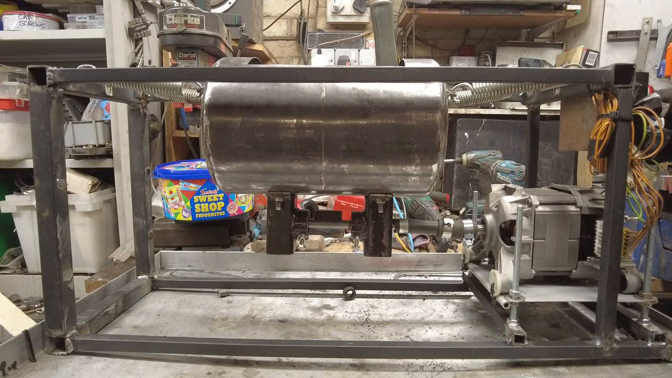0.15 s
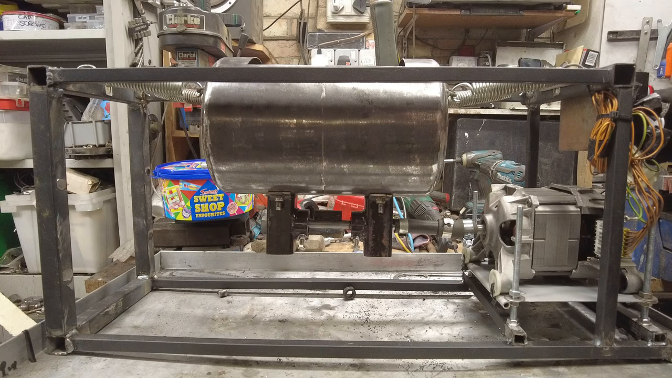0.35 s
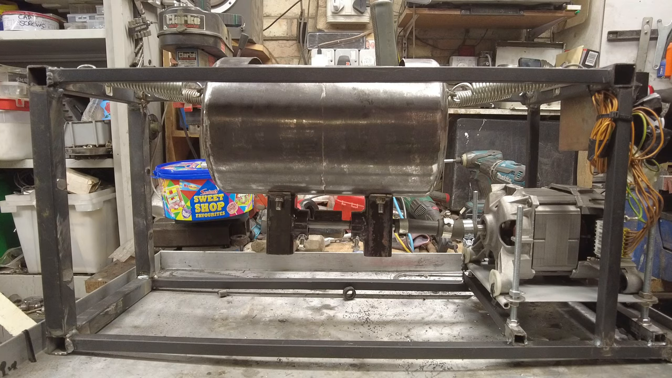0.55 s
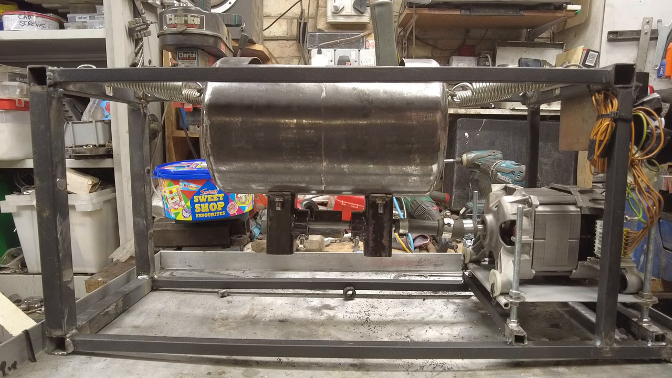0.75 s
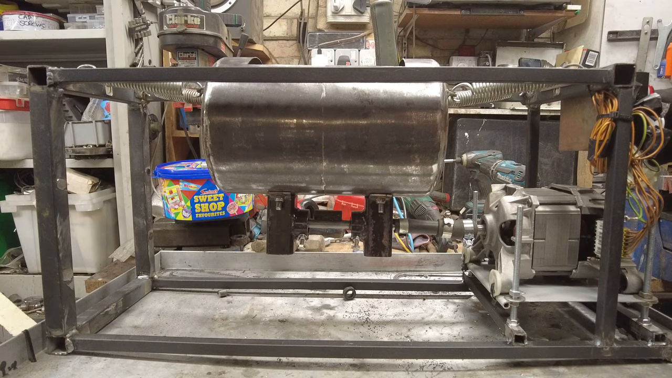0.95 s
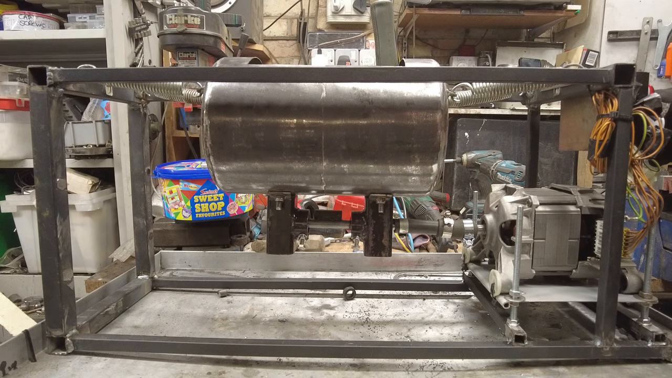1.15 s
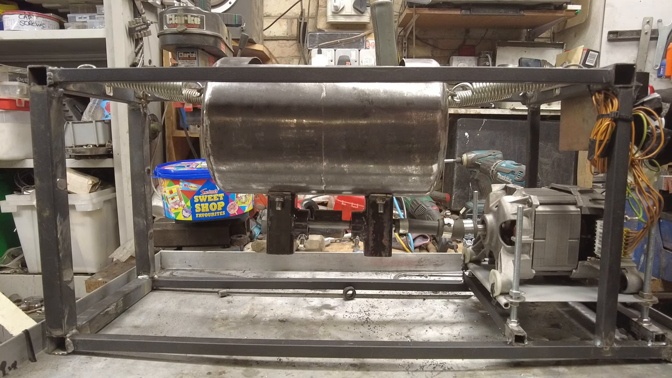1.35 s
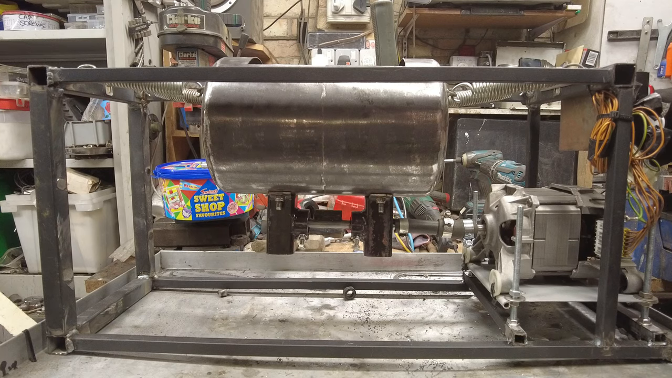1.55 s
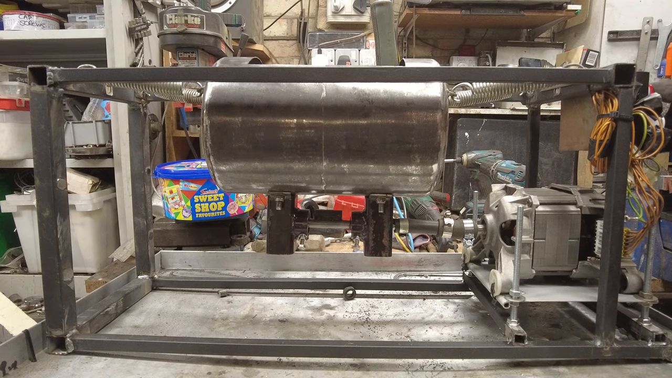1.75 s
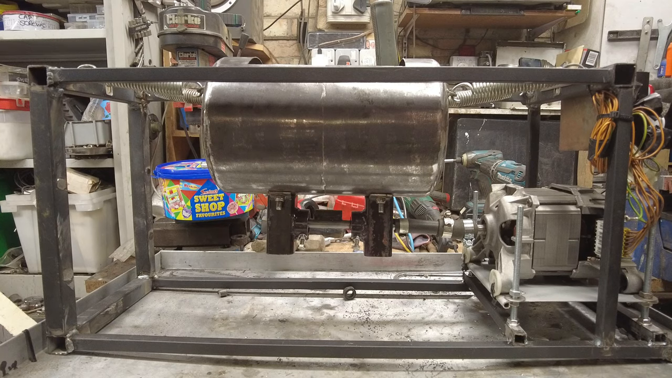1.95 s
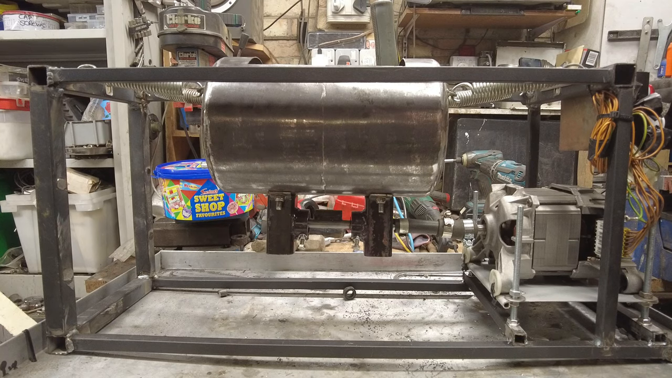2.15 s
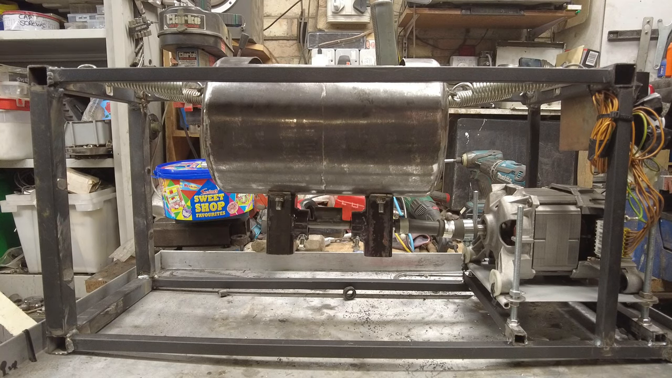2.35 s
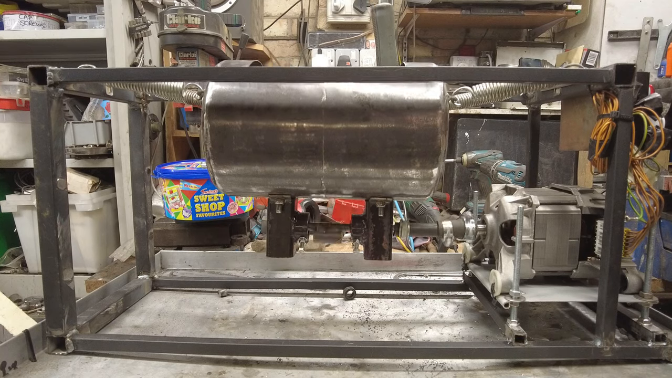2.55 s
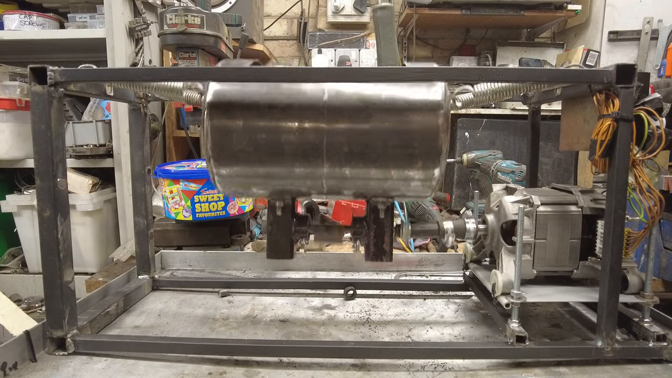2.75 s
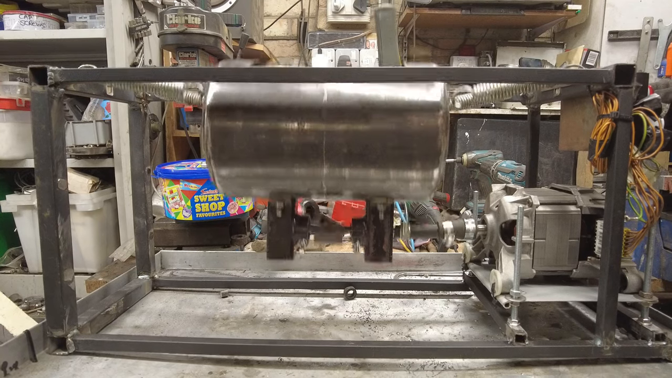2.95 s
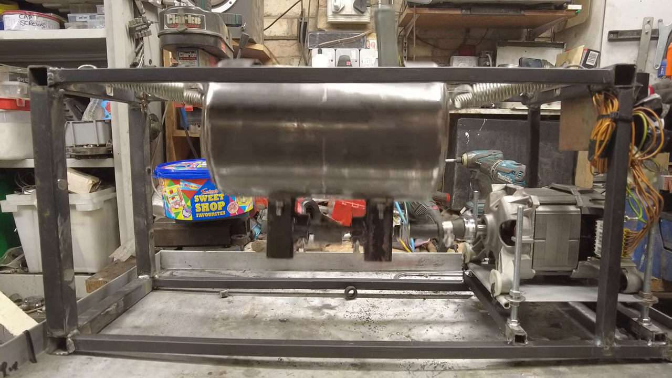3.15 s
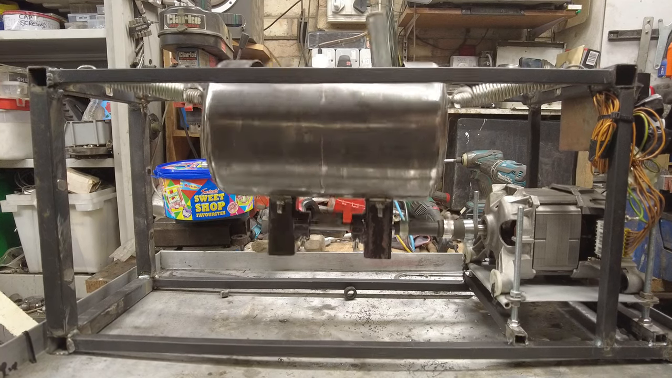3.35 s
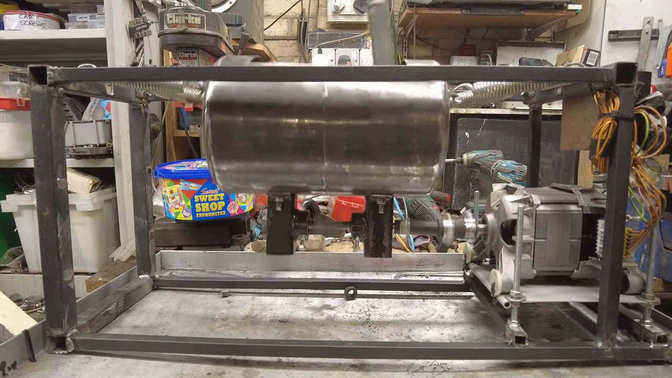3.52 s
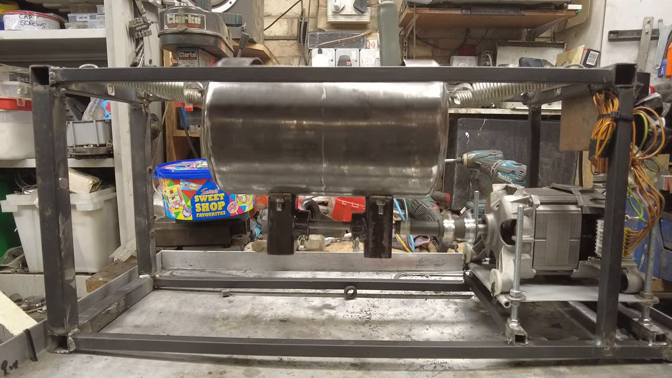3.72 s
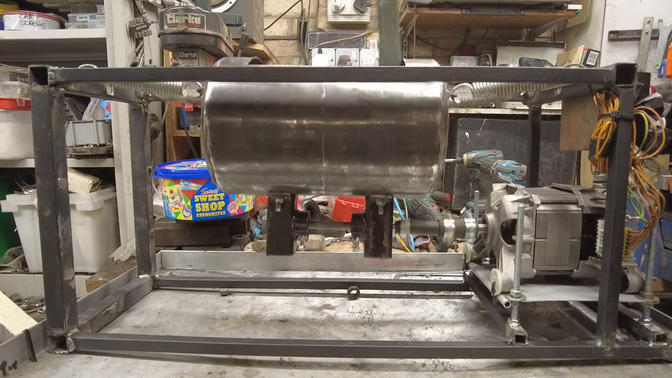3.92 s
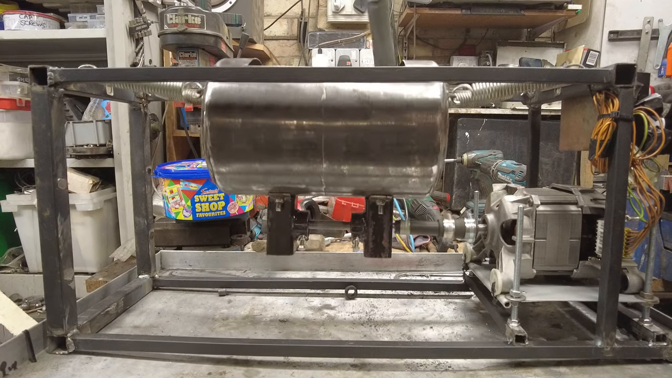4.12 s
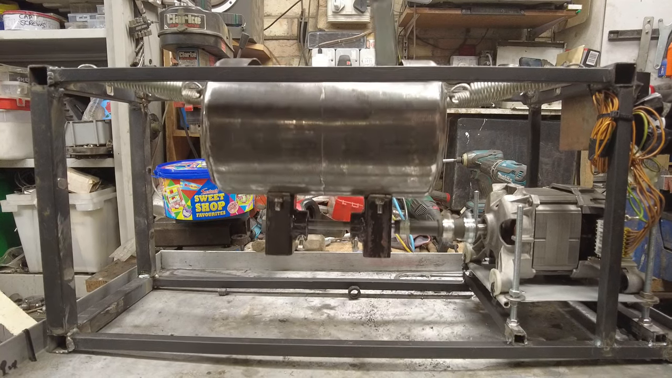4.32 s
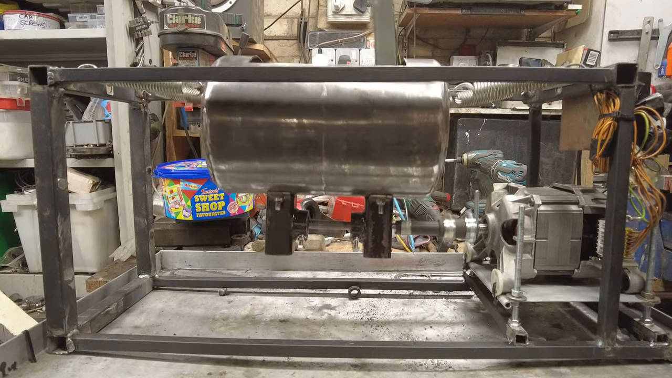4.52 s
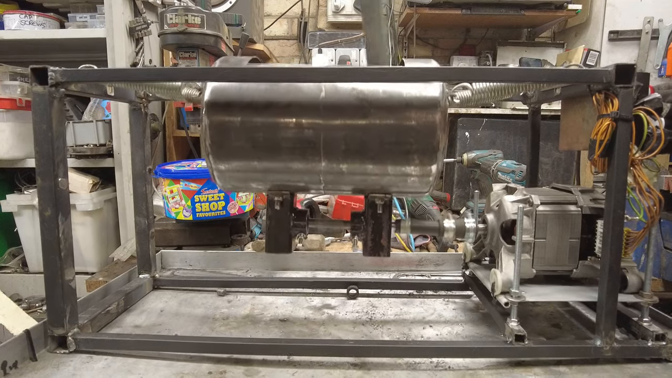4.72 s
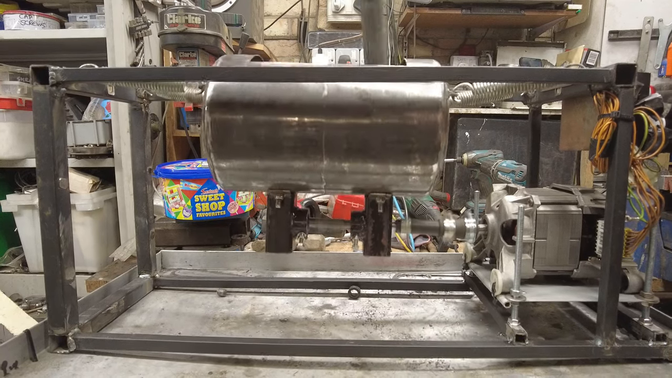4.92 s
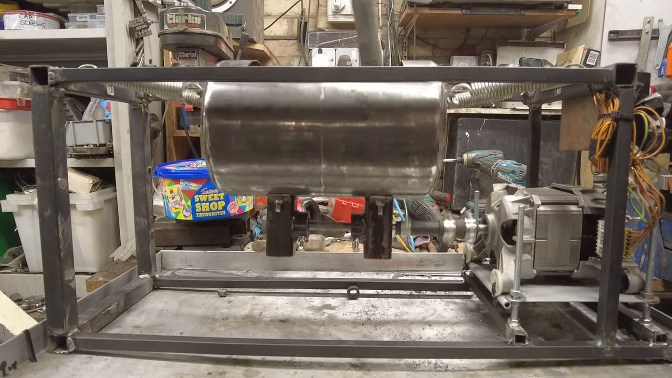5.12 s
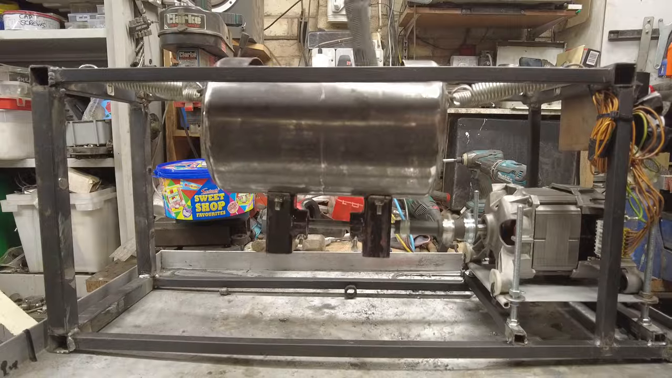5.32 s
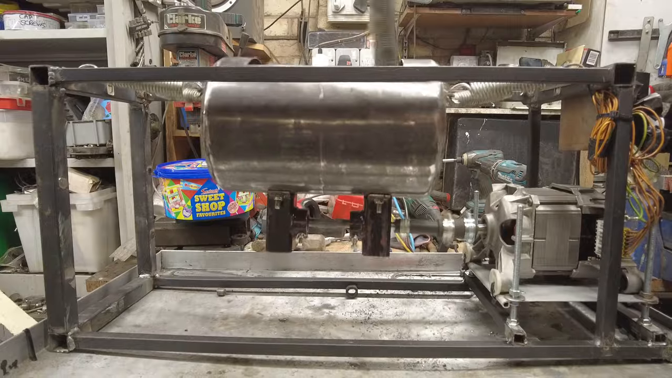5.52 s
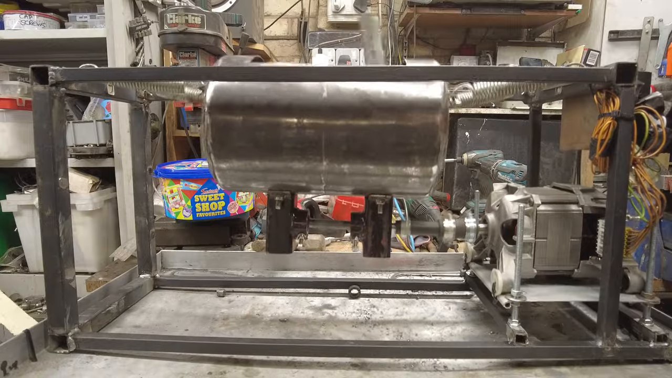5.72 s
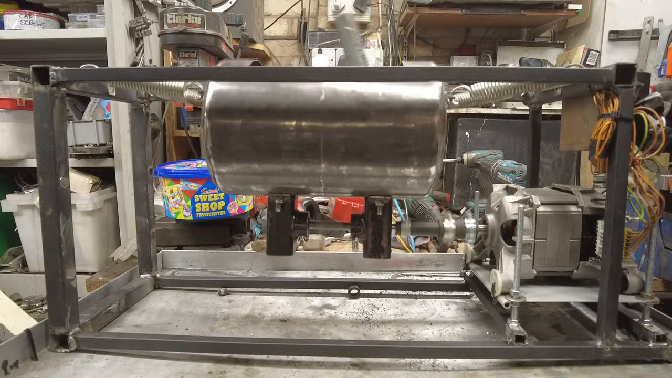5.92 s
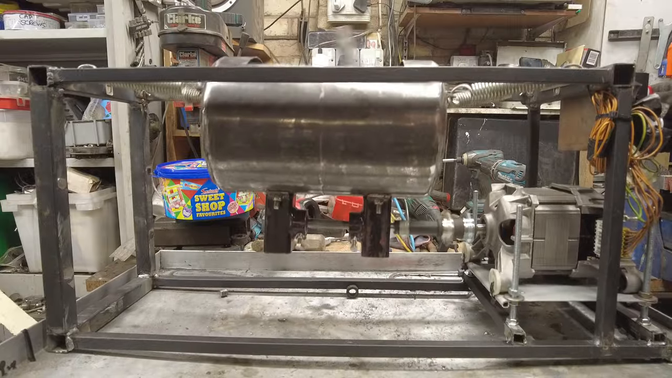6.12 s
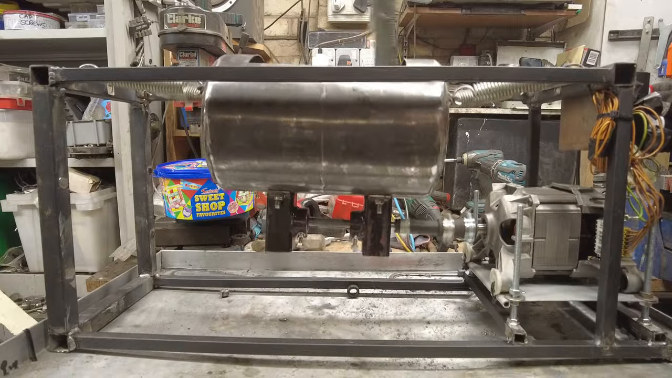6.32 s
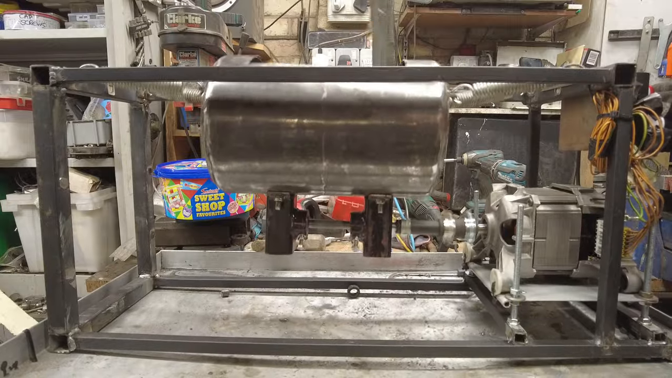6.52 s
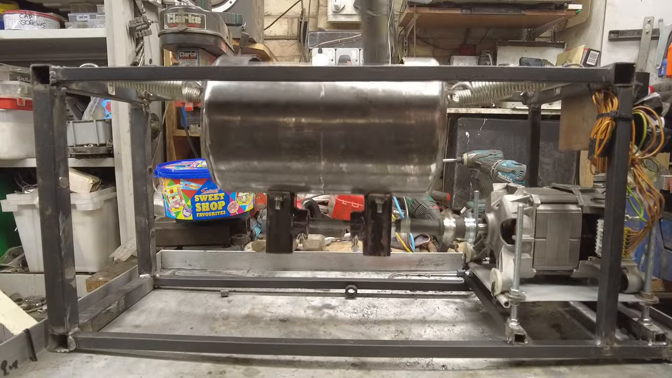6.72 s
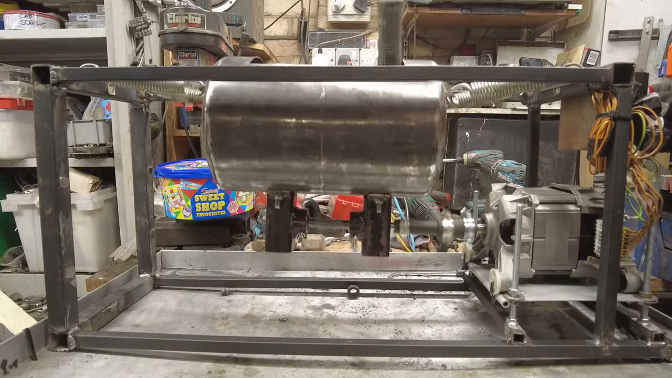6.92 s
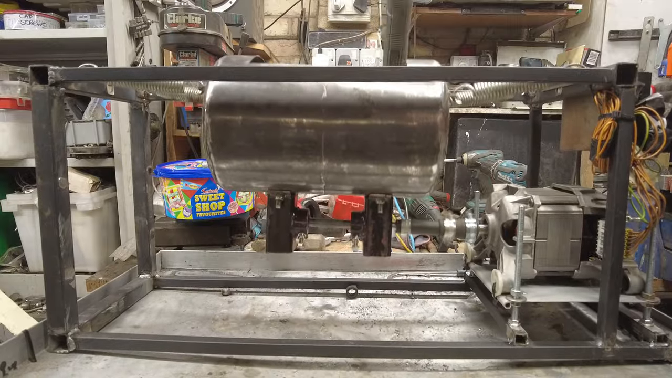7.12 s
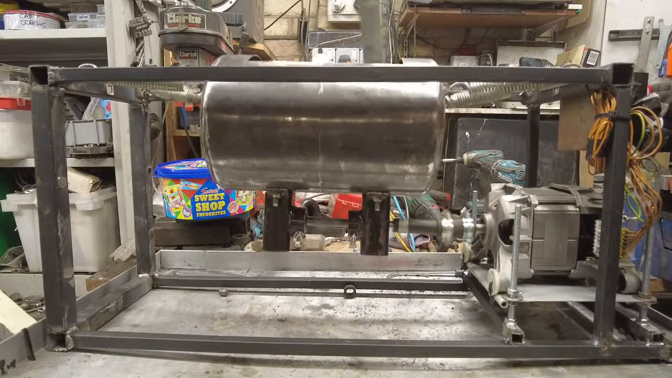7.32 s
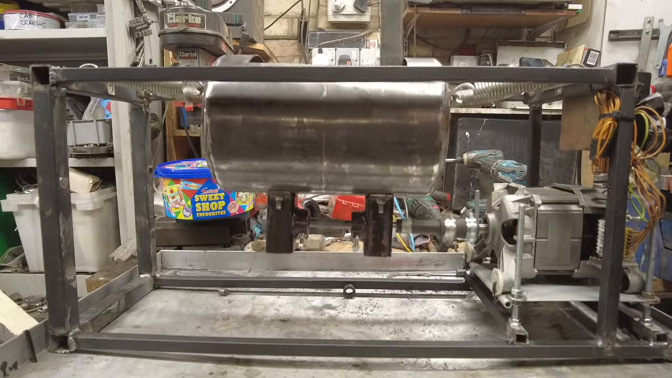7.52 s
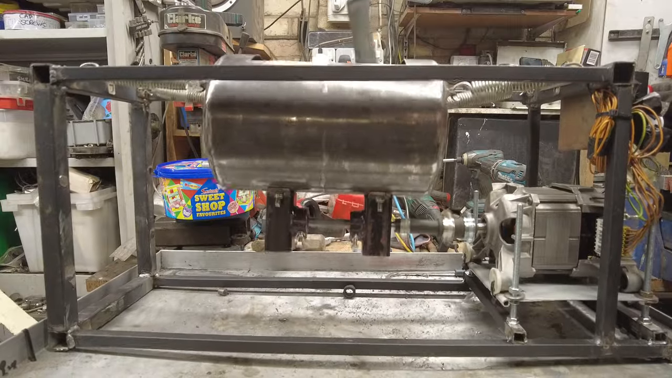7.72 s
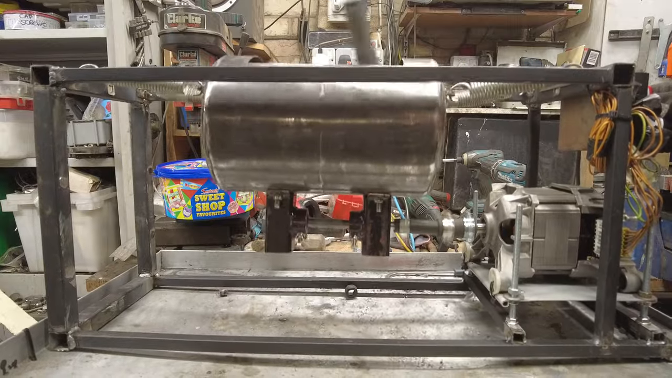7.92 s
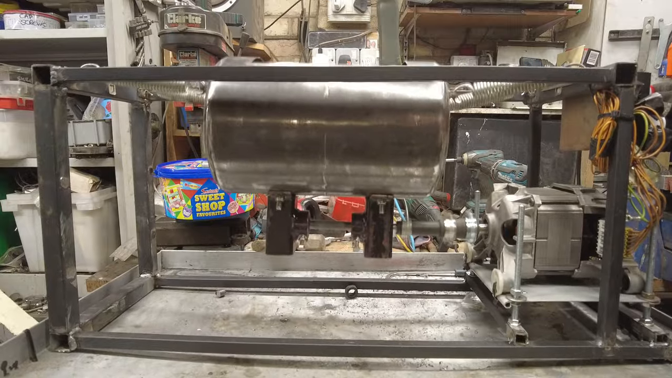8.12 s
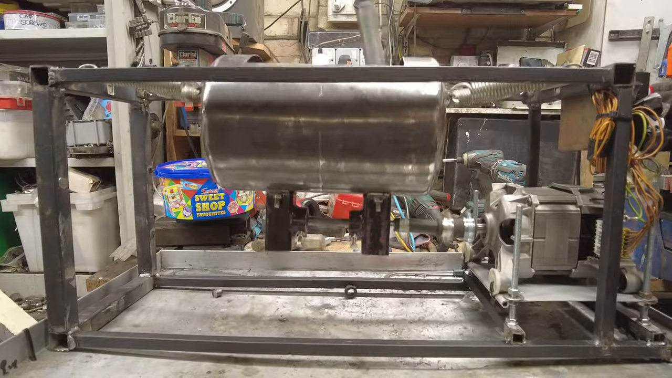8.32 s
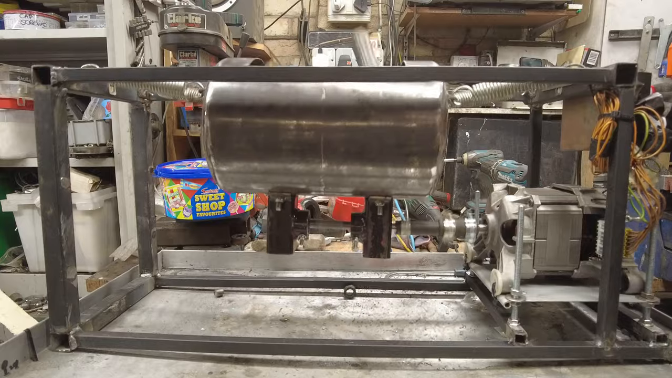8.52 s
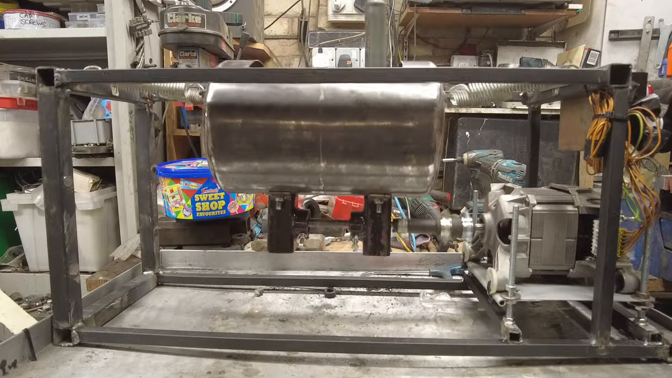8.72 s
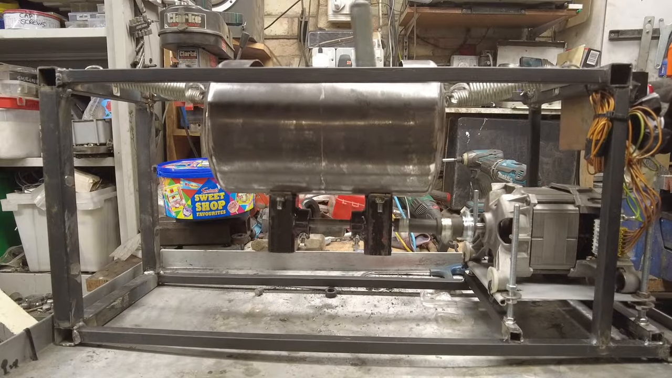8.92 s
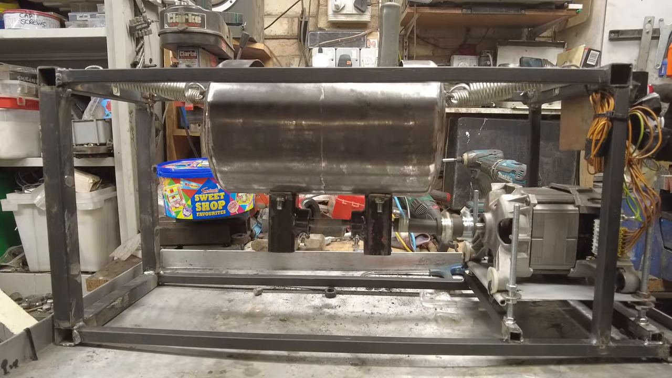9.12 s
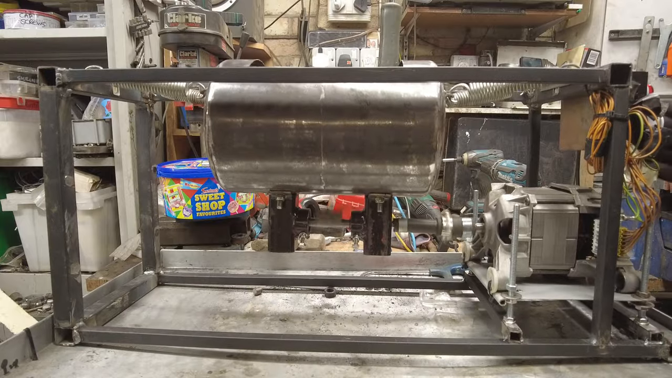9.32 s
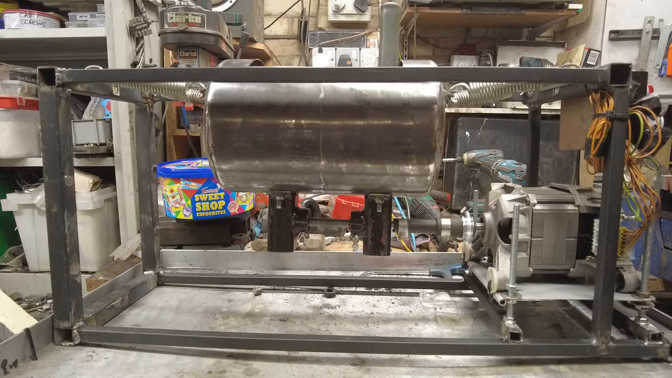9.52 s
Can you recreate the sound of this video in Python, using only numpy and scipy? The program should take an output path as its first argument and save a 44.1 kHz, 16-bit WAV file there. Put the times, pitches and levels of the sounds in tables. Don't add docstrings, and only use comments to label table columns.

```python
import sys
import numpy as np
from scipy import signal
from scipy.fft import rfft, irfft, next_fast_len
from scipy.io import wavfile
from scipy.ndimage import uniform_filter1d

SR = 44100
rng = np.random.default_rng(int(sys.argv[2]) if len(sys.argv) > 2 else 0)


def log_audio(samples):
    frames = np.atleast_2d(samples).T
    limited = np.clip(frames, -1, 1)
    pcm = np.round(limited * 32767).astype(np.int16)
    wavfile.write(sys.argv[1], SR, pcm)


def volts_from_decibels(level):
    exponent = np.asarray(level, float) / 20
    return 10 ** exponent


N = 421596
SIZE = next_fast_len(N + SR)
SPOTS, RING_LEN = 8, 8192

# mode_hz, width_hz, peak_db
BELLY_MODES = [(288, 6, 5), (299, 9, 3.5), (311, 8, 4.5), (322, 9, 4), (334, 9, 4.5), (346, 9, -2),
               (362, 10, -8), (391.7, 8, -11)]
# mode_hz, width_hz, peak_db
SHELL_MODES = [(740, 14, -6), (757, 9, -2), (800, 7, 1), (897, 12, -9), (919, 9, -4.5), (962, 11, -6),
               (987, 10, 1.5), (1003, 12, -8), (1126, 12, -5), (1190, 10, -9), (1235, 18, -10),
               (1440, 12, -7.5), (1465, 14, -9), (1532, 11, -4), (1653, 10, -4.5), (1700, 16, -8),
               (1740, 16, -9), (1808, 14, -8), (1868, 16, -8), (1950, 20, -14), (2088, 16, -15)]
# mode_hz, width_hz, peak_db
PART_MODES = [(2318, 29, 1), (2354, 29, 4), (2620, 27, -1), (2996, 22, 4.5), (4310, 110, -2),
              (5730, 42, -4.5), (6400, 45, -11)]
# mode_hz, width_hz, peak_db
CLINK_MODES = [(7780, 160, -1), (9190, 59, -1), (10630, 160, -12)]
# freq_hz, density_db_per_hz
THICKET = [(50, -27), (160, -21), (200, -20.5), (450, -21), (650, -20.5), (900, -18), (1350, -16.5),
           (1750, -14.5), (2100, -22.5), (2500, -21.5), (4500, -30.5), (6000, -31), (7200, -38),
           (16000, -47.5)]
# freq_hz, t60_s
RING_T60 = [(300, 0.18), (1500, 0.34), (4000, 0.13), (9000, 0.15), (16000, 0.059)]
# freq_hz, side_db
SIDE_SHARE = [(60, -23), (110, -12), (200, -24), (380, -29), (520, -10), (760, -8), (1290, -24), (2380, -8),
              (4400, -2.5), (8120, -3), (15000, 1)]
# low_hz, high_hz
SPLITS_HZ = [(40, 1340), (1340, 2200), (2200, 7000), (7000, 17000)]
THICKET_DB = [-3.5, -3]

# time_s, level_db
SHAKING = [(2.3, -68), (2.6, -49), (2.76, -37), (2.85, -25), (2.99, -23.5), (3.05, -0.5), (3.1, -11),
           (3.21, -26), (3.25, 12.5), (3.3, -0.5), (3.37, -14), (3.47, 11), (3.53, -8), (3.61, -1),
           (4.2, 3.5), (5.5, 1), (7.4, 3), (8.9, 0.5), (9.56, -1)]
# centre_s, depth_db
LULLS = [(3.7, 0), (4.28, 2.5), (4.66, -2), (4.93, 4.5), (5.3, 1), (5.52, 3), (6.141, -1.5), (6.28, 0),
         (6.64, 1.5), (6.8, 2), (7.29, -2), (7.77, 1.5), (7.871, 4.5), (8.05, 2.5), (8.25, 3.5), (8.66, 0),
         (8.9, 4), (9.11, 3.5), (9.258, 4), (9.441, 0.5)]
HAIL_DB = [-22.5, -27, -29, -33.5, -44.5]
HAIL_GROWTH = [0.71, 0.85, 0.89, 0.97, 1.1]
BOUNCE_DB = [-14.5, -11.5, -10, -7, -8]
COAST_DB = [-0.5, -3.5, -2, 0.5, -4]
CLACK_DB = [-9, -2, -2.5, 0.5, 10.5]
BANG_DB = [-23, -2.5, 2.5, -9, -21]
BOOM_DB = [-4, -18.5, -20, -16, -32]
TINK_DB = [-24, -7, -4, 4.5, 2.5]
# start_s, peak_db, then shell_db, belly_db, tick_db relative to parts
FIRST_BLOWS = [(2.609, -60, 8, -3, -12), (2.702, -59.5, 13, 19.5, -12), (2.7338, -49, -3, -14, -12),
               (2.7818, -42.5, 3, 11, 1.5), (2.8334, -35, 6, 9.5, -12), (2.87, -47, 13, 12.5, -16),
               (2.904, -48.5, 14.5, 16, -20), (2.9313, -52, -1, -10, 4), (2.955, -58, -1, -8, -3),
               (2.965, -43, 9, 15, -7), (2.974, -52, -1, -8, -1), (3.01, -41, 8, 4, 1),
               (3.041, -14.5, 8.5, 4, -5), (3.052, -17.5, 2, 7, -16), (3.2353, -3, 1, -5, -12),
               (3.388, -23.5, 7.5, 7, 3), (3.423, -7.5, 0.5, -4, -13), (3.453, -26.5, 2, 5, -11),
               (3.487, -13, 1, -16, -9)]
# start_s, peak_db, tick_minus_parts_db
CLACKS = [(3.5425, -13.5, -27), (3.6236, -36, -21), (3.7337, -14, -22), (3.7858, -21, -29),
          (3.8134, -11, -22), (3.9055, -20.5, -23), (3.9875, -22, -9), (4.0615, -14.5, -18),
          (4.115, -12.5, -16), (4.3712, -10.5, -22), (4.4492, -12.5, -18), (4.5353, -13.5, -22),
          (4.6784, -22, -26), (4.7283, -14.5, -30), (4.8294, -14, -17), (4.8683, -20, -12),
          (4.9732, -21, -13), (5.0234, -28, -26), (5.1086, -15, -18), (5.3574, -12.5, -22),
          (5.418, -10, -18.5), (5.5617, -14, -22), (5.6177, -12.5, -17), (5.7093, -25, -15),
          (5.7487, -13, -18), (5.8155, -15.5, -27), (5.9019, -18.5, -15), (5.9541, -20, -25),
          (6.0197, -14, -18), (6.05, -13, -17), (6.202, -23.5, -27), (6.2489, -13.5, -20),
          (6.308, -19, -18), (6.346, -15, -30), (6.4186, -13.5, -20), (6.531, -15, -10.5),
          (6.598, -16.5, -16), (6.6837, -23, -5), (6.8653, -20, -30), (6.9211, -17.5, -23),
          (7.0549, -13, -21), (7.1165, -18.5, -17), (7.2007, -17, -17), (7.4115, -17, -20),
          (7.4684, -16, -20), (7.5268, -17, -20), (7.5763, -11, -24), (7.7006, -13, -12),
          (7.8071, -22, -21), (7.9208, -18.5, -8), (7.958, -16, -16), (8.286, -16, -18), (8.3164, -18, -20),
          (8.3618, -8.5, -21), (8.5524, -12, -22), (8.9485, -10.5, -21), (9.0479, -14, -22),
          (9.1755, -16.5, -20), (9.342, -18.5, -25), (9.4962, -18, -30)]
# start_s, peak_db, upper_shell_minus_all_db
BANGS = [(3.54, -10.5, -4), (3.59, -14, -8), (3.623, -8.5, -8.5), (3.733, -14, -16), (3.813, -9, -19),
         (3.903, -9, -15), (3.929, -14.5, -5), (3.986, -8.5, -10), (4.015, -7, -2.5), (4.06, -7, -4),
         (4.18, -26, -11), (4.233, -12, -11), (4.276, -17, -4), (4.334, -11.5, -21), (4.379, -9, -1),
         (4.408, -14, -16), (4.448, -10, -12), (4.491, -10.5, -11), (4.535, -5, -10), (4.716, -10, -5.5),
         (4.812, -7.5, -11), (4.864, -12, -4), (4.974, -11, -9), (5.022, -11.5, -11), (5.08, -13, -15),
         (5.109, -5, -16), (5.348, -19, -13), (5.416, -9.5, -10), (5.558, -14, -3), (5.617, -7, -10),
         (5.816, -8.5, -4.5), (5.896, -8.5, -1.5), (5.96, -8.5, -6), (6.051, -25, -5), (6.201, -10, -7),
         (6.353, -6.5, -21), (6.506, -11.5, -9), (6.54, -12.5, -7), (6.685, -8, -28), (6.919, -11, -3),
         (6.953, -8.5, -6), (7.348, -12, -9), (7.406, -11, -4.5), (7.494, -7, -17), (7.575, -7, -7),
         (7.809, -10.5, -10), (7.894, -13.5, -7.5), (7.919, -10, -5), (7.98, -8, -10), (8.067, -15.5, -19),
         (8.315, -3, -5.5), (8.361, -12, -7), (8.512, -17, -6), (8.55, -5, -10.5), (8.79, -12, -8),
         (8.948, -7.5, -30), (8.98, -11.5, -5.5), (9.044, -6.5, -3.5), (9.179, -11, -21),
         (9.337, -12.5, -15)]
# start_s, peak_db
BOOMS = [(3.625, -9.5), (3.736, -8.5), (3.831, -13), (3.886, -6.5), (3.938, -9), (3.976, -8), (4.026, -4),
         (4.084, -11), (4.123, -7.5), (4.191, -12.5), (4.288, -7.5), (4.398, -14), (4.426, -8),
         (4.509, -11), (4.622, -9), (4.768, -8.5), (4.849, -11.5), (4.887, -7.5), (4.943, -14),
         (5.075, -17), (5.141, -19), (5.177, -33), (5.22, -12.5), (5.261, -9.5), (5.421, -15),
         (5.645, -10.5), (5.703, -12.5), (5.742, -10), (5.81, -14), (5.854, -9.5), (5.998, -9),
         (6.076, -11), (6.166, -7.5), (6.421, -9.5), (6.469, -34), (6.604, -12), (6.665, -17), (6.805, -11),
         (6.88, -14), (6.943, -11), (7.005, -10.5), (7.214, -5), (7.362, -7), (7.52, -14), (7.63, -26),
         (7.701, -9.5), (7.762, -16.5), (7.843, -8), (7.901, -9), (7.958, -14.5), (8.084, -13), (8.133, -7),
         (8.214, -8), (8.474, -21), (8.512, -7.5), (8.695, -7), (8.788, -11.5), (8.897, -20), (9.428, -10),
         (9.525, -8)]
# start_s, peak_db
TINKS = [(3.6231, -32), (3.7333, -26), (3.813, -29), (3.9848, -27), (4.099, -23), (4.1803, -41),
         (4.2327, -23), (4.313, -26), (4.3694, -33), (4.3983, -23), (4.463, -21.5), (4.536, -27),
         (4.6548, -23), (4.754, -24), (4.8204, -35), (4.8648, -23), (4.972, -29), (5.1092, -23),
         (5.1912, -20), (5.2637, -23.5), (5.3582, -29), (5.419, -18), (5.4794, -37), (5.5308, -29),
         (5.6174, -27), (5.7373, -26), (5.8548, -17.5), (5.9533, -28), (6.021, -26), (6.2354, -37),
         (6.3075, -30), (6.3544, -34), (6.4207, -28), (6.527, -20), (6.602, -22), (6.6497, -28),
         (6.6865, -27), (6.742, -42), (6.9196, -30), (7.0014, -34), (7.1093, -25), (7.196, -27),
         (7.3304, -19.5), (7.415, -27), (7.5749, -21), (7.6494, -27), (7.6992, -30), (7.8944, -25),
         (7.923, -22), (8.079, -24.5), (8.28, -31), (8.3153, -26), (8.3613, -17.5), (8.4711, -35),
         (8.5514, -24), (8.6932, -24), (8.9183, -28), (9.0453, -27), (9.179, -38), (9.3196, -38)]

# time_s, hum_db, buzz_db
HUM = [
    (1.12, -72, -78),
    (1.17, -53.5, -68.5),
    (1.55, -51.5, -68.5),
    (2.222, -51, -69),
    (2.37, -46.5, -72),
    (2.49, -45, -76),
    (2.56, -44, -75),
    (2.732, -47, -75),
    (2.77, -54, -75),
]
# mains_multiple, level_db
HUM_ORDERS = [(2, 0), (3, -32), (4, -11), (5, -36), (6, -24), (8, -33)]
# freq_hz, level_db
RUMBLE = [(60, -20), (150, 6), (300, -22), (450, -12), (700, -42)]
# line_hz, level_db
BUZZ_LINES = [(1303, -88), (1502, -86), (1550, -90), (1653, -90), (1701, -89), (1750, -81), (1852, -85),
              (1900, -84), (1949, -87), (2051, -89), (2099, -82), (2153, -84), (2250, -80), (2304, -75),
              (2353, -83), (2401, -91), (2455, -90), (2552, -90), (2654, -89), (2853, -90), (3004, -85),
              (3101, -89), (3203, -92), (3300, -83)]
# freq_hz, level_db
RASP = [(900, -6), (1200, -18), (1450, -13), (1800, -6), (2050, -7), (2300, -20), (2700, -10), (3300, -6),
        (3800, -16), (4600, -13)]
# start_s, peak_db, centre_hz, t60_s
KNOCKS = [(1.133, -56, 773, 0.19), (1.131, -58.5, 2800, 0.11), (1.138, -59, 247, 0.75),
          (2.33, -67, 3500, .12), (2.35, -56, 330, 0.48), (2.36, -60, 1000, .16), (2.48, -69, 3700, 0.092),
          (2.608, -56, 1500, .1), (2.789, -38.5, 169, 1), (2.801, -45.5, 496, 0.94),
          (3.032, -31.5, 130, 0.53)]
# start_s, peak_db, pitch_hz, t60_s
CREAKS = [(2.318, -66, 3370, .08), (2.47, -67, 2300, .15), (2.474, -76, 3600, .09), (2.477, -72, 9600, .1),
          (2.611, -54, 1340, .07), (2.627, -64, 1750, .06), (2.705, -64, 1500, .08),
          (2.733, -56, 1600, .05), (2.735, -51, 2000, .07)]

# time_s, pitch_hz, level_db
DRONE = [
    (3.85, 43.3, -52),
    (4.03, 50.7, -31),
    (4.25, 63.4, -38.5),
    (4.49, 72.7, -37),
    (4.89, 80.8, -35.5),
    (5.51, 85, -37),
    (6.5, 83.4, -35),
    (8.74, 81.5, -35),
    (8.82, 79.6, -50),
]
# time_s, level_db
SHAKE = [(0.0, -64), (0.61, -60), (2.5, -60), (3.06, -41.5), (3.6, -51), (4.05, -39), (4.25, -47),
         (6.6, -51), (8.2, -42), (8.6, -52), (9.1, -40), (9.56, -38)]
# freq_hz, level_db_per_hz
HISS = [(41, -31), (70, -4), (145, -21.5), (204, -14), (961, -30.5), (1700, -29.5), (3000, -35),
        (4100, -34), (4630, -31.5), (9500, -37), (10300, -42), (13200, -43), (14400, -32), (16200, -29)]


def barrel():
    hail_rate_hz, hail_scatter_db, lull_s = 600, 21.5, 0.036
    bounce_s, blow_gain_db = 0.022, 2
    coast_start_s, coast_fade_s = 8.85, 0.21
    gate, (shaking_db,) = curves(SHAKING)
    t = np.arange(N) / SR
    shaking_db = shaking_db - sum(db * np.exp(-((t - s) / lull_s) ** 2) for s, db in LULLS)
    coast = np.clip((t - coast_start_s) / coast_fade_s, 0, 1)

    when, where, strength = rng.random((3, int(hail_rate_hz * N / SR)))
    hail = np.zeros((SPOTS, N))
    hail[(where * SPOTS).astype(int), (when * N).astype(int)] = volts_from_decibels(hail_scatter_db * strength)
    hail = gate * unit(hail) / np.sqrt(SPOTS)

    blow_s, blow_db = blows()
    chance = rng.random((len(blow_s), 12))
    first = np.zeros((len(blow_s), 1))
    delay_s = np.hstack([first, -bounce_s * np.log(chance[:, 1:6])])
    at = np.minimum(((blow_s[:, None] + delay_s) * SR).astype(int), N - 1)
    spot = (997 * chance[:, 6:] % SPOTS).astype(int)

    start = int(SHAKING[0][0] * SR)
    out = np.zeros((2, N))
    layers = zip(barrel_rings(), HAIL_DB, HAIL_GROWTH, blow_db, BOUNCE_DB, COAST_DB)
    for ring, hail_db, growth, db, bounce_db, coast_db in layers:
        size = np.hstack([first + 1, volts_from_decibels(bounce_db) * chance[:, 7:]])
        knocks = hail * volts_from_decibels(hail_db + growth * shaking_db + coast_db * coast)
        peak = volts_from_decibels(db + blow_gain_db)[:, None] / np.abs(ring).max()
        np.add.at(knocks, (spot, at), size * peak)
        knocks = knocks.reshape(len(ring), -1, N).sum(axis=1)
        push = np.float32(knocks[:, None, start:])
        rung = signal.oaconvolve(push, np.float32(ring), axes=2).sum(axis=0)
        out[:, start:] += rung[:, :N - start]
    return out


def blows():
    s, db, shell_db, belly_db, tick_db = np.transpose(FIRST_BLOWS)
    times = [s]
    levels = [db + np.array([belly_db, shell_db - 2.5, shell_db - 3.5, 0 * s, tick_db])]
    kinds = [(CLACKS, CLACK_DB, [0, 0, 0, 0, 1]), (BANGS, BANG_DB, [0, 0, 1, 0, 0]),
             (BOOMS, BOOM_DB, 0), (TINKS, TINK_DB, 0)]
    for table, kind_db, bright_layer in kinds:
        s, db, *bright_db = np.transpose(table)
        times.append(s)
        levels.append(db + np.array(kind_db)[:, None] + np.outer(bright_layer, bright_db or 0))
    return np.hstack(times), np.hstack(levels)


def barrel_rings():
    low, mid, high, top = (thicket(*band) for band in SPLITS_HZ)
    parts = high + volts_from_decibels(-5.5) * rings(PART_MODES, 9.7, 1.4)
    ticks = top + volts_from_decibels(-7.5) * rings(CLINK_MODES, 18.0, 1.2)
    edge = signal.cheby1(6, 1, 280, "high", fs=SR, output="sos")
    belly = signal.sosfilt(edge, rings(BELLY_MODES, 2.5, 4.5, together=True))[:SPOTS // 2]
    lower, upper = ([m for m in SHELL_MODES if lo < m[0] < hi] for lo, hi in SPLITS_HZ[:2])
    lower = rings(lower, 7, 1.25) + volts_from_decibels(THICKET_DB[0]) * low
    upper = rings(upper, 7, 0.98) + volts_from_decibels(THICKET_DB[1]) * mid
    return belly, lower, upper, parts[..., :RING_LEN // 2], ticks[..., :RING_LEN // 3]


def rings(modes, scatter_db, rise_cycles, together=False):
    hz, width_hz, db = np.transpose(modes)
    t = np.arange(RING_LEN) / SR
    turn = 2 * np.pi * np.outer(hz, t)
    rise = (1 - np.exp(-np.outer(hz, t) / rise_cycles)) ** 2
    fade = np.exp(-np.pi * np.outer(width_hz, t)) * rise
    sine, cosine = fade * np.sin(turn), fade * np.cos(turn)
    sign, size, a, b = rng.standard_normal((4, SPOTS, len(hz)))
    size = volts_from_decibels(scatter_db * size)
    size = size / np.sqrt(np.mean(size ** 2, axis=0))
    gain = (1 if together else np.sign(sign)) * size * volts_from_decibels(db) * width_hz
    share = gain * volts_from_decibels(read(SIDE_SHARE, hz)) / np.sqrt(2)
    return ports(gain @ sine, (share * a) @ sine + (share * b) @ cosine)


def thicket(lo_hz, hi_hz):
    hz = np.arange(RING_LEN // 2 + 1) * SR / RING_LEN + 1
    t = np.arange(RING_LEN) / SR
    noise = rfft(rng.standard_normal((2, SPOTS, RING_LEN)))
    noise = noise * volts_from_decibels(read(THICKET, hz)) * (hz > lo_hz) * (hz <= hi_hz)
    noise[1] *= volts_from_decibels(read(SIDE_SHARE, hz))
    out = 0
    for centre_hz in lo_hz * 2 ** np.arange(0, np.log2(hi_hz / lo_hz) + .5, .5):
        t60_s = read(RING_T60, centre_hz)
        rise = 1 - np.exp(-t * centre_hz / 0.57)
        band = np.maximum(1 - 2 * np.abs(np.log2(hz / centre_hz)), 0)
        out = out + irfft(noise * band) * rise * volts_from_decibels(-60 * t / t60_s) / np.sqrt(t60_s)
    return ports(*out)


def ports(mid, side):
    return np.stack([mid + side, mid - side], axis=1) / np.sqrt(np.sum(mid ** 2) / SPOTS)


def motor():
    mains_hz, rumble_db, rasp_db = 50.03, -19.5, -9.5
    grow_s, grow_start_db = 0.3, -5
    switch_hz, switch_db, switch_t60_s = 545, -57, 0.4
    gate, (hum_db, buzz_db) = curves(HUM)
    t = np.arange(N // 3) / SR
    n = len(t)
    turn = 2 * np.pi * mains_hz * t
    hum = sum(volts_from_decibels(db) * np.sin(k * turn + 6 * rng.random()) for k, db in HUM_ORDERS) * np.sqrt(2)
    hum = hum + volts_from_decibels(rumble_db) * unit(colour(rng.standard_normal(N), RUMBLE))[:n]

    lines = 0
    for hz, db in BUZZ_LINES:
        waver_db = 1.3 * np.sin(9 * rng.random() * t + 6 * rng.random())
        lines = lines + volts_from_decibels(db + waver_db) * np.sin(round(hz / mains_hz) * turn + 6 * rng.random())
    age_s = np.maximum(t - HUM[0][0], 0)
    lines = unit(lines) * volts_from_decibels(grow_start_db * np.exp(-(age_s / grow_s) ** 2))
    rasp = rng.standard_normal(n) * (1 + .5 * np.sin(2 * turn))
    rasp = unit(colour(rasp, [(300, -28), *RASP, (7000, -61)]))[:n]
    buzz = lines + volts_from_decibels(rasp_db) * rasp

    out = np.zeros(N)
    out[:n] = (gate * volts_from_decibels(hum_db))[:n] * hum + (gate * volts_from_decibels(buzz_db))[:n] * buzz
    half = SR // 2
    t = t[:half]
    for s, db, hz, t60_s in KNOCKS:
        band = signal.butter(2, [hz / np.sqrt(2), hz * np.sqrt(2)], "band", fs=SR)
        knock = unit(signal.lfilter(*band, rng.standard_normal(half)))
        out[int(s * SR):][:half] += knock * volts_from_decibels(db - 60 * t / t60_s)
    for s, db, hz, t60_s in CREAKS:
        attack = np.minimum(t / 0.0027, 1)
        out[int(s * SR):][:half] += volts_from_decibels(db - 60 * t / t60_s) * attack * np.sin(2 * np.pi * hz * t)
    switch = volts_from_decibels(switch_db - 60 * t / switch_t60_s) * np.sin(2 * np.pi * switch_hz * t)
    out[int(KNOCKS[0][0] * SR):][:half] += switch
    return out


def frame():
    gate, (hz, db) = curves(DRONE)
    drone = gate * volts_from_decibels(db) * np.sqrt(2) * np.sin(2 * np.pi * np.cumsum(hz) / SR)
    spectrum = [(10, 0.5), (25, -5), (45, 2.5), (70, -12), (130, -52), (400, -88)]
    mid, side = unit(colour(rng.standard_normal((2, N)), spectrum))
    shake_db = curves(SHAKE)[1][0]
    return drone + volts_from_decibels(shake_db) * (mid + 0.18 * side * np.array([[1], [-1]]))


def garage(x):
    t60_s, level_db = 0.3, -13
    t = np.arange(SR // 2) / SR
    tail = rng.standard_normal((2, len(t))) * volts_from_decibels(-60 * t / t60_s) * (t > .006)
    band = signal.butter(2, [600, 7000], "band", fs=SR)
    tail = signal.lfilter(*band, 0.28 * tail[0] + 2.0 * tail)
    tail = tail / np.sqrt(np.sum(tail[0] ** 2))
    return volts_from_decibels(level_db) * signal.fftconvolve(x, tail, axes=1)[:, :N]


def hiss():
    return volts_from_decibels(-73.5) * unit(colour(rng.standard_normal((2, N)), HISS)) * np.sqrt(2)


def read(table, hz):
    f, v = np.transpose(table)
    return np.interp(np.log(np.maximum(hz, 1)), np.log(np.maximum(f, 1)), v)


def curves(table):
    s, *columns = np.transpose(table)
    t = np.arange(N) / SR
    gate = uniform_filter1d(((t > s[0]) & (t < s[-1] + .05)) * 1., size=600)
    return gate, [np.interp(t, s, c) for c in columns]


def unit(x):
    return x / np.sqrt(np.mean(x ** 2))


def colour(x, table):
    hz = np.arange(SIZE // 2 + 1) * SR / SIZE
    return irfft(rfft(x, SIZE) * volts_from_decibels(read(table, hz)), SIZE)[..., :N]


def scene():
    near = barrel() + motor()
    return near + garage(near) + frame() + hiss()


def top_cut(x):
    return signal.sosfilt(signal.butter(12, 16340, fs=SR, output="sos"), x)


def record(dry):
    limit_db, limit_share, top_hz = -20.5, 0.16, 15730
    loudness = np.sqrt(uniform_filter1d(np.mean(dry ** 2, axis=0), size=900) + 1e-12)
    held = dry * np.maximum(loudness / volts_from_decibels(limit_db), 1) ** -limit_share
    rounded = np.tanh(0.8 * held) / 0.82
    mix = colour(rounded, [(top_hz, 0), (top_hz + 30, -90)])
    return top_cut(mix)


dry = scene()
out = record(dry)
log_audio(out)
```